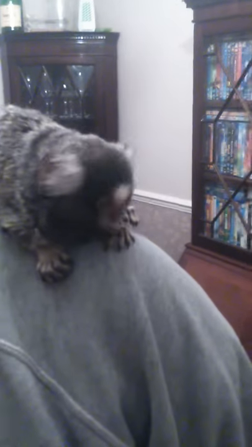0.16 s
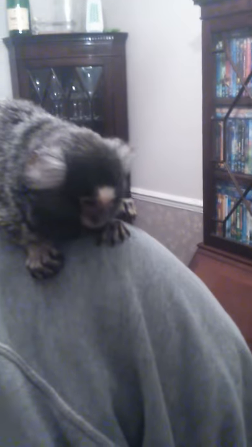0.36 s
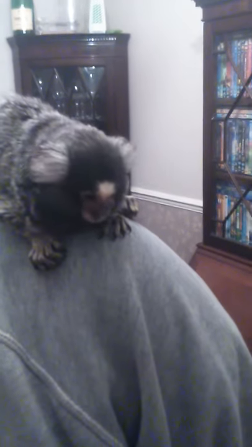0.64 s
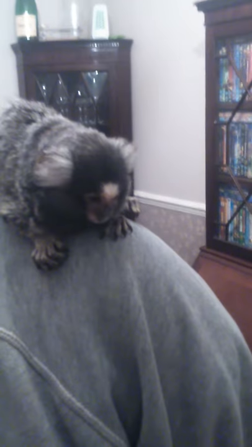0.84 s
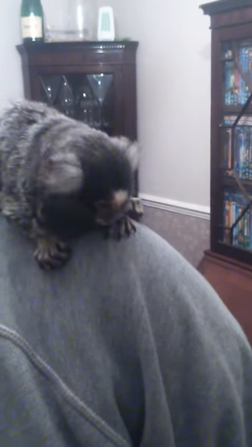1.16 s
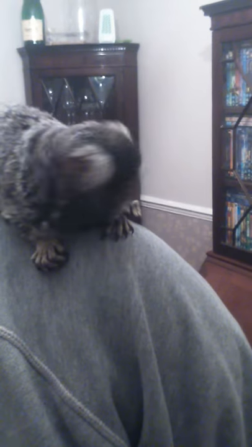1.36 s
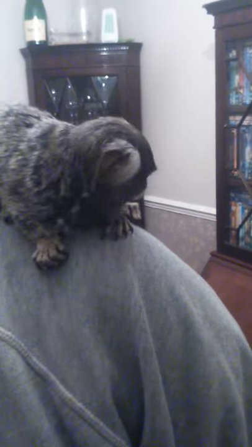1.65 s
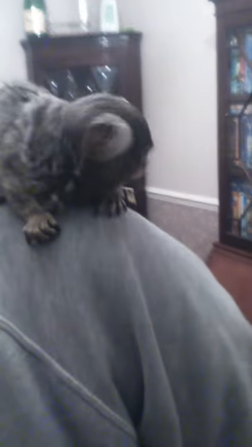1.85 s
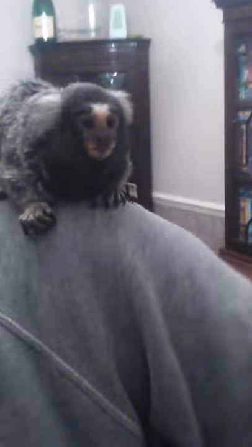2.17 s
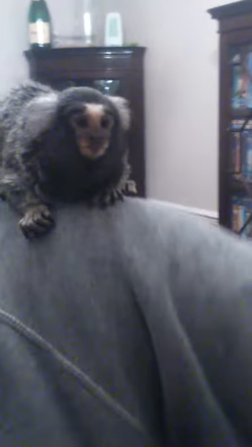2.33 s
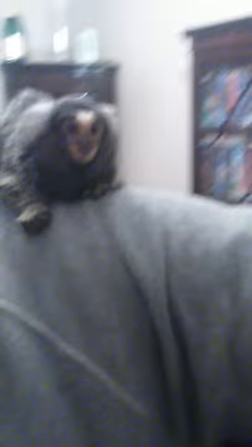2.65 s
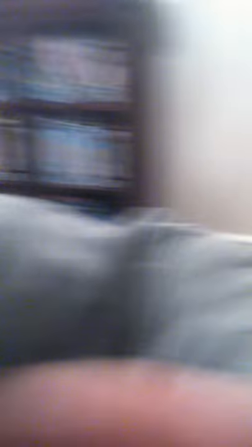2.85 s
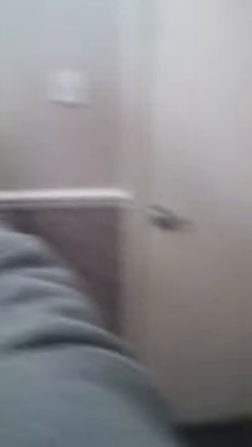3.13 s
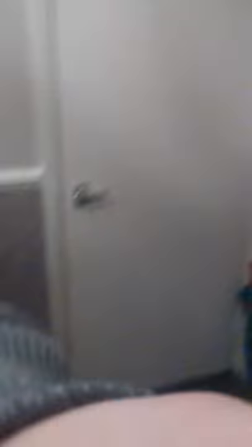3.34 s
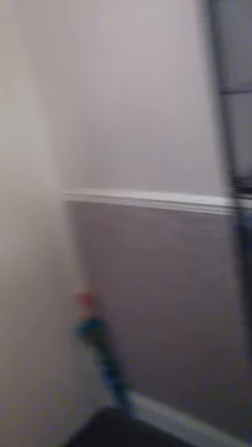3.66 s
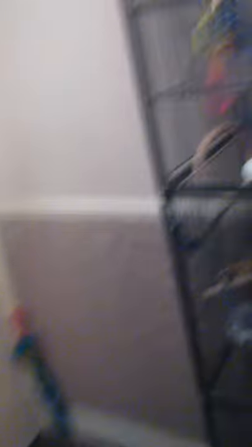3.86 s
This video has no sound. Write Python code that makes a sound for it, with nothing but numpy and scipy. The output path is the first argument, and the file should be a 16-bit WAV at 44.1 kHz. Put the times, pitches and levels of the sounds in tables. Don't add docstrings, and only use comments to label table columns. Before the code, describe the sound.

A small monkey chitters faintly in a quiet room, then a finger loudly thumps the microphone.

```python
import sys
import numpy as np
from scipy import signal
from scipy.fft import rfft, irfft, next_fast_len
from scipy.io import wavfile
from scipy.ndimage import map_coordinates

SR = 44100
rng = np.random.default_rng(int(sys.argv[2]) if len(sys.argv) > 2 else 0)


def magnitude_from_level(level_db):
    exponent = np.asarray(level_db, float) / 20
    return 10 ** exponent


def transcribe(u):
    v = np.clip(np.atleast_2d(u).T, -1, 1)
    q = np.round(v * 32767).astype(np.int16)
    wavfile.write(sys.argv[1], SR, q)


N = 176400

MOUTH_HIGH_HZ, MOUTH_HIGH_WIDTH_HZ = 4480, 1250
MOUTH_LOW_HZ, MOUTH_LOW_WIDTH_HZ = 2450, 1800


def unit(x):
    return x / np.sqrt(np.mean(x ** 2) + 1e-20)


def curves(rows, **ends):
    s, *columns = np.transpose(rows)
    return [np.interp(np.arange(N) / SR, s, column, **ends) for column in columns]


def wobble(rate):
    knots = rng.standard_normal(int(N * rate / SR) + 4)
    return map_coordinates(knots, [np.arange(N) * rate / SR])


def filtered(x, response):
    m = next_fast_len(N + SR // 2)
    return irfft(rfft(x, m) * response(np.fft.rfftfreq(m, 1 / SR)), m)[..., :N]


def noise(points):
    f, db = np.transpose(points)
    shape = lambda hz: magnitude_from_level(np.interp(np.log(hz + 1), np.log(f), db))
    return unit(filtered(rng.standard_normal(N), shape))


def resonance(centre_hz, width_hz):
    return lambda f: 1j * f * width_hz / (centre_hz ** 2 - f * f + 1j * f * width_hz)


def gate(s, length):
    u = (np.arange(N) / SR - s) / length
    return np.sin(np.pi / 2 * np.clip(np.minimum(u / 0.13, (1 - u) / 0.33), 0, 1)) ** 2


def room_rumble():
    # (frequency [Hz], density [dB per Hz])
    rumble_spectrum = [(15, -38), (25, -2), (59, 0), (171, -15.5), (202, -13.5), (226, -17.5), (299, -18),
                       (325, -17.5), (700, -30.5), (910, -51), (1540, -120)]
    return magnitude_from_level(-59 + wobble(7)) * noise(rumble_spectrum)


def mains_hum():
    # (frequency [Hz], level [dB rms])
    hum_tones = [(199.2, -76.5), (301.5, -75.5)]
    t = np.arange(N) / SR
    return sum(magnitude_from_level(db + 2.5 + 2.1 * wobble(6.27)) * np.sin(2 * np.pi * hz * t) for hz, db in hum_tones)


def microphone_hiss():
    # (frequency [Hz], density [dB per Hz])
    hiss_spectrum = [(290, -16), (500, -0.5), (1070, -2.5), (1700, -4.5), (2810, -5.5), (3490, -7),
                     (15600, -10)]
    return magnitude_from_level(-65) * noise([(300, -12.5)] + list(hiss_spectrum))


def cloth_rustle():
    # (time [s], level [dB])
    rustle_levels = [
        (3.47, -66),
        (3.626, -69),
        (3.638, -62.5),
        (3.736, -66),
        (3.81, -60.5),
        (3.828, -65),
        (3.856, -58.5),
        (3.926, -74),
        (4.0, -73),
    ]
    # (frequency [Hz], density [dB per Hz])
    cloth_spectrum = [(2500, -21), (4000, -13), (7500, -9), (10000, -10.5), (12000, -15.5), (16000, -17)]
    db, = curves(rustle_levels, left=-120)
    return magnitude_from_level(db + 0.78 * wobble(44) + 1.5 * wobble(400)) * noise(cloth_spectrum)


def case_knocks():
    # (time [s], peak [dB], ring [Hz], t60 [s], extra pitch at the start [multiple of ring]); the first
    # row is not a knock but a brief 700 Hz ring that deepens the monkey's chatter at 1.327 s
    knock_rows = [(1.327, -53.5, 700, .025, 1.1), (1.4215, -40, 258, 0.016, 1.1),
                  (2.331, -47, 100, 0.044, .3), (2.704, -44.5, 61.4, 0.19, .1),
                  (2.923, -33.5, 86, 0.045, 4.5), (3.029, -42.5, 153, 0.023, 4.7),
                  (3.13, -46, 80.5, 0.064, .1), (3.159, -46, 79, .04, .1), (3.225, -39, 76.4, 0.12, 0.33),
                  (3.401, -28, 70, 0.15, .1), (3.899, -51.5, 450, 0.018, 0.33)]
    settle_s = 0.0014
    out, t = np.zeros(N + SR), np.arange(SR // 5) / SR
    for s, db, hz, t60, hard in knock_rows:
        turn = 2 * np.pi * hz * (t + hard * settle_s * (1 - np.exp(-t / settle_s)))
        out[round(s * SR):][:len(t)] -= magnitude_from_level(db - 60 * t / t60) * np.sin(turn)
    return out[:N]


def case_creaks():
    # (time [s], peak [dB])
    creak_rows = [(2.917, -53), (1.4212, -49), (2.970, -47), (2.993, -54), (3.012, -49.5), (3.029, -44),
                  (3.05, -52), (3.222, -50), (3.233, -45), (3.268, -39), (3.899, -55)]
    spike_s = 0.00007
    out, t = np.zeros(N + SR), np.arange(SR // 5) / SR
    for s, db in creak_rows:
        out[round(s * SR):][:len(t)] += magnitude_from_level(db + 13) * t / spike_s * np.exp(-t / spike_s)
    return out[:N]


def port_seals():
    # (time [s], length [s])
    gap_rows = [
        (3.3015, .005),
        (3.308, .0078),
        (3.3165, .0028),
        (3.3203, .0017),
        (3.324, .0037),
        (3.3325, .0038),
    ]
    edge_s = .0004
    t = np.arange(N) / SR
    return 1 - sum(np.clip(np.minimum(t - s, s + length - t) / edge_s, 0, 1) for s, length in gap_rows)


def finger_pump():
    # (time [s], rate [Hz], pressure [dB])
    pump_rows = [
        (3.26, 55, -36.5),
        (3.3, 54.3, -23),
        (3.306, 53, -4.5),
        (3.328, 55.8, -10),
        (3.339, 58.4, -8),
        (3.36, 60, -8.5),
        (3.374, 121.8, -12),
        (3.396, 167, -13.5),
        (3.407, 200, -45),
    ]
    hz, push_db = curves(pump_rows, left=-120, right=-120)
    hz, = curves([row[:2] for row in pump_rows])
    t = np.arange(N) / SR
    start_turn = 1.054
    turns = np.cumsum(hz * (t > pump_rows[0][0])) / SR + start_turn
    return magnitude_from_level(push_db) * (np.sin(2 * np.pi * turns) + 0.15 * wobble(350))


def skin_scrape():
    # (time [s], level [dB])
    rub_levels = [
        (3.2, -70),
        (3.287, -50.5),
        (3.299, -26.5),
        (3.322, -37),
        (3.344, -31.5),
        (3.357, -37),
        (3.389, -16),
        (3.402, -24.5),
        (3.435, -58),
    ]
    # (frequency [Hz], density [dB per Hz])
    skin_spectrum = [(60, -12.5), (300, -2.5), (700, -12), (2500, -15), (5000, -23), (9000, -40),
                     (16000, -46)]
    db, = curves(rub_levels, left=-120, right=-120)
    return magnitude_from_level(db + 1.8 * wobble(700)) * noise(skin_spectrum)


def air_leak():
    # (time [s], level [dB])
    leak_levels = [
        (3.28, -68),
        (3.3, -43),
        (3.31, -50),
        (3.36, -52),
        (3.385, -46.5),
        (3.403, -32),
        (3.43, -46.5),
        (3.453, -60.5),
        (3.465, -81),
    ]
    # (frequency [Hz], density [dB per Hz])
    jet_spectrum = [(300, -1), (1500, -2.5), (4000, -5), (7500, -1), (10000, -10.5), (16000, -12)]
    db, = curves(leak_levels, left=-120, right=-120)
    return magnitude_from_level(db + 1.6 * wobble(360)) * noise(jet_spectrum)


def skin_slips():
    # (time [s], pressure jump [full scale], rise [ms], fall [ms])
    slip_rows = [(3.301, -.5, .8, 1.8), (3.3065, -.85, .07, 1.8), (3.3159, .22, .08, 1.5),
                 (3.3195, .16, .14, 1.0), (3.3232, .7, .9, 2.5), (3.332, -.8, .9, 2.5),
                 (3.3865, -.5, .2, .7), (3.3932, -.7, .3, .8), (3.3964, .6, .04, .1),
                 (3.39655, -2.4, .05, .09), (3.3968, .8, .05, .1)]
    t, out = np.arange(N) / SR, 0
    for s, jump, rise_ms, fall_ms in slip_rows:
        ms = np.clip(t - s, 0, None) * 1000
        out = out + jump * (1 - np.exp(-ms / rise_ms)) ** 2 * np.exp(-ms / fall_ms)
    return out


def preamp_whine():
    # (frequency [Hz], level [dB])
    whine_tones = [(6000, -65), (12000, -71)]
    t = np.arange(N) / SR
    whine = sum(magnitude_from_level(db + 5 * wobble(300)) * np.sin(2 * np.pi * hz * t) for hz, db in whine_tones)
    return whine * gate(3.3, 0.069)


def capsule_limit(x):
    rail, knee = .45, 4
    return x / (1 + np.abs(x / rail) ** knee) ** (1 / knee)


def room(x):
    t60_s, level_db, gap_s = 0.2, -11, 0.0034
    t = np.arange(SR // 2) / SR
    tail = rng.standard_normal(len(t)) * magnitude_from_level(-60 * t / t60_s) * (t > gap_s)
    return magnitude_from_level(level_db) * signal.fftconvolve(x, tail / np.linalg.norm(tail))[:N]


def chatter():
    # (time [s], length [s], level [dB], lower resonance re upper [dB])
    chatter_rows = [(1.228, 0.024, -65, -10), (1.3, 0.014, -57.5, 6.5), (1.318, 0.022, -60.5, 3.5),
                    (1.266, .016, -62, -14), (1.487, 0.011, -68, 4), (1.843, 0.011, -62.5, -2),
                    (1.415, 0.016, -59, -0.5), (1.4745, 0.0038, -51.5, -18), (1.483, .004, -47.5, -14),
                    (1.5, 0.028, -55, -4.5), (1.61, 0.02, -62, -8.5), (1.627, 0.028, -62.5, -14),
                    (1.709, 0.0099, -61, -19), (1.719, 0.014, -57.5, -7.5), (1.732, 0.0082, -56.5, -10),
                    (1.833, 0.0036, -55.5, -4), (1.935, 0.021, -56, -4.5), (2.024, 0.0067, -64, -9),
                    (2.102, 0.022, -58, -6), (2.123, 0.024, -62, -9.5), (2.2146, .0035, -49.5, -16),
                    (2.335, 0.022, -58.5, -4), (2.35, 0.039, -60, -13), (2.385, 0.021, -66.5, -9),
                    (2.416, 0.017, -63, -11), (2.44, 0.032, -67, -12), (2.557, 0.021, -62.5, -8.5)]
    pulses_per_s, scatter_db, breath = 1300, 3, 1.31
    pulses = (rng.random(N) < pulses_per_s / SR) * magnitude_from_level(scatter_db * rng.standard_normal(N))
    buzz = unit(pulses) + breath * rng.standard_normal(N) * magnitude_from_level(2.9 * wobble(220))
    high = sum(magnitude_from_level(db) * gate(s, length) for s, length, db, low_db in chatter_rows)
    low = sum(magnitude_from_level(db + low_db) * gate(s, length) for s, length, db, low_db in chatter_rows)
    upper = resonance(MOUTH_HIGH_HZ, MOUTH_HIGH_WIDTH_HZ)
    lower = resonance(MOUTH_LOW_HZ, MOUTH_LOW_WIDTH_HZ)
    bright = filtered(buzz * high, lambda f: upper(f) ** 4)
    dark = filtered(buzz * low, lambda f: lower(f) ** 2 / (1 + 1j * f / 4000) ** 2)
    return 3.9 * bright + 4 * dark


def squeal():
    # (time [s], pitch [Hz], level [dB])
    squeal_rows = [
        (1.228, 3696, -52),
        (1.241, 2753, -49.5),
        (1.245, 3085, -72),
        (1.253, 3330, -57),
        (1.262, 3050, -53),
        (1.273, 2567, -54.5),
        (1.29, 3130, -53),
        (1.303, 1846, -54.5),
        (1.308, 1800, -78),
    ]
    hz, = curves([row[:2] for row in squeal_rows])
    db, = curves([row[::2] for row in squeal_rows], left=-120, right=-120)
    turn = 2 * np.pi * np.cumsum(hz * (1 + .04 * wobble(400))) / SR
    octave = magnitude_from_level(-18 + 6.9 * wobble(90)) * np.sin(2 * turn)
    return magnitude_from_level(db + 1 + 1.1 * wobble(250)) * (np.sin(turn) + octave)


def chirps():
    # (time [s], length [s], level [dB], first pitch [Hz], last pitch [Hz])
    chirp_rows = [(1.219, 0.0069, -37, 5100, 4510), (1.225, .0045, -37.5, 4500, 3980),
                  (1.221, 0.0047, -40.5, 2290, 1750), (1.2956, 0.0033, -43, 5250, 4260),
                  (1.298, 0.007, -37.5, 4250, 4050), (1.3036, 0.01, -35.5, 4054, 4100),
                  (1.322, .007, -50, 4320, 4200), (1.326, .0045, -45, 4220, 4070),
                  (1.332, 0.0054, -40.5, 4120, 3940), (1.421, 0.01, -49.5, 4390, 4490),
                  (1.453, .015, -50, 7000, 6640), (1.459, .015, -56, 5200, 5500),
                  (1.473, .018, -45, 5750, 5220), (1.49, 0.0064, -42, 5350, 4900),
                  (1.4954, 0.0067, -38.5, 4920, 4210), (1.502, .004, -44, 4350, 4300),
                  (1.508, .008, -45, 4490, 4500), (1.514, 0.01, -42.5, 4370, 4370),
                  (1.7217, .006, -41, 2550, 2550), (1.722, 0.0068, -44, 1400, 1350),
                  (1.7204, .006, -50, 4820, 4620), (1.726, 0.0058, -43, 2640, 2500),
                  (1.612, .007, -49.5, 4970, 4700), (1.633, 0.0098, -51, 4930, 4560),
                  (1.842, 0.0046, -43.5, 4580, 4180), (1.846, 0.0072, -53, 4260, 4460),
                  (1.860, 0.0034, -53.5, 4830, 4700), (1.942, 0.005, -46, 4420, 4100),
                  (2.036, 0.008, -37, 2410, 3120), (2.042, .005, -47, 3780, 4330),
                  (2.094, 0.0065, -50, 4800, 4200), (2.132, 0.0048, -54, 4450, 4500),
                  (2.111, 0.0099, -44.5, 4300, 4340), (2.121, 0.0059, -46, 4300, 3830),
                  (2.2158, 0.0079, -44, 4150, 4490), (2.223, 0.0034, -53, 4300, 4300),
                  (2.403, .007, -52, 5400, 6400), (2.421, 0.011, -57, 4500, 4250),
                  (2.407, 0.01, -44.5, 4860, 4490), (2.103, .006, -44, 1700, 2400)]
    out, t = np.zeros(N), np.arange(N) / SR
    flutter, waver = magnitude_from_level(2 * wobble(330)), 1 + 0.022 * wobble(500)
    for s, length, db, first_hz, last_hz in chirp_rows:
        on = slice(int(s * SR), int((s + length) * SR) + 1)
        glide = 1 - (1 - np.clip((t[on] - s) / length, 0, 1)) ** 1.7
        hz = (first_hz + (last_hz - first_hz) * glide) * waver[on]
        turn = 2 * np.pi * np.cumsum(hz) / SR
        tone = np.sin(turn) + magnitude_from_level(-22) * np.sin(turn / 2)
        out[on] += magnitude_from_level(db - 1) * gate(s, length)[on] * tone
    mouth = resonance(MOUTH_HIGH_HZ, MOUTH_HIGH_WIDTH_HZ)
    return filtered(out * flutter, lambda f: 0.22 + mouth(f) ** 2)


def scene():
    background = room_rumble() + mains_hum() + microphone_hiss() + cloth_rustle()
    handling = case_knocks() + case_creaks() + skin_scrape() + air_leak()
    monkey = chirps() + squeal() + chatter()
    outside = monkey + room(monkey) + handling + background
    pressure = outside * port_seals() + finger_pump()
    return (capsule_limit(pressure) + skin_slips() + preamp_whine())[None]


def low_pass(x):
    return signal.sosfilt(signal.butter(12, 15760, fs=SR, output="sos"), x)


def record(dry):
    bass_hz, bass_q, top_hz = 41.8, 0.78, 15800

    def band(f):
        high_pass = f * f / (f * f - bass_hz ** 2 - 1j * f * bass_hz / bass_q)
        return high_pass ** 2 * (f < top_hz)

    return low_pass(filtered(dry, band))


dry = scene()
out = record(dry)
transcribe(out)
```